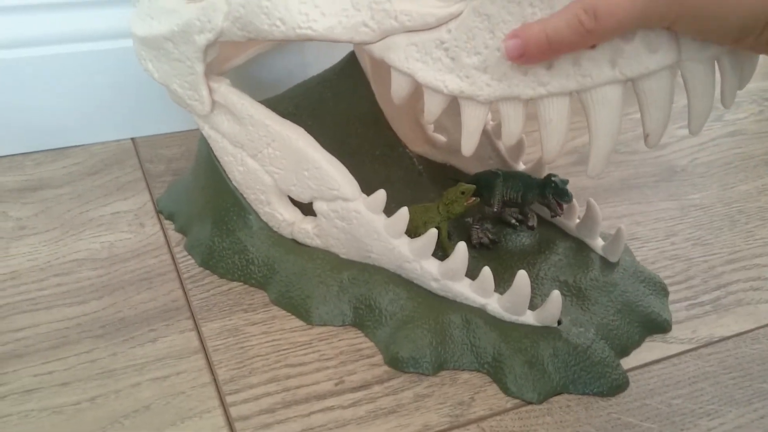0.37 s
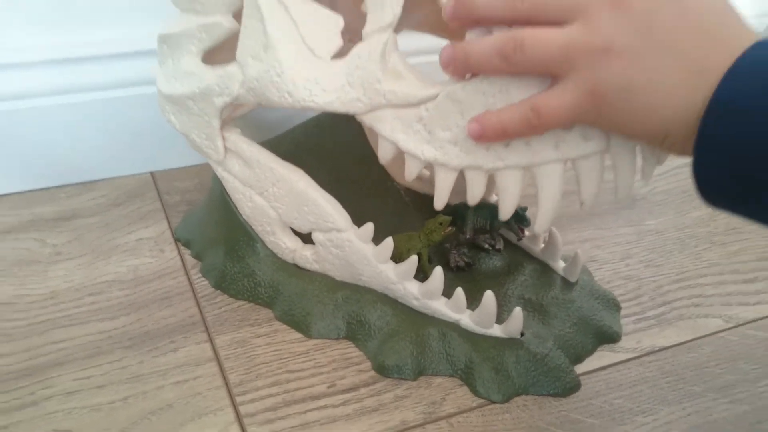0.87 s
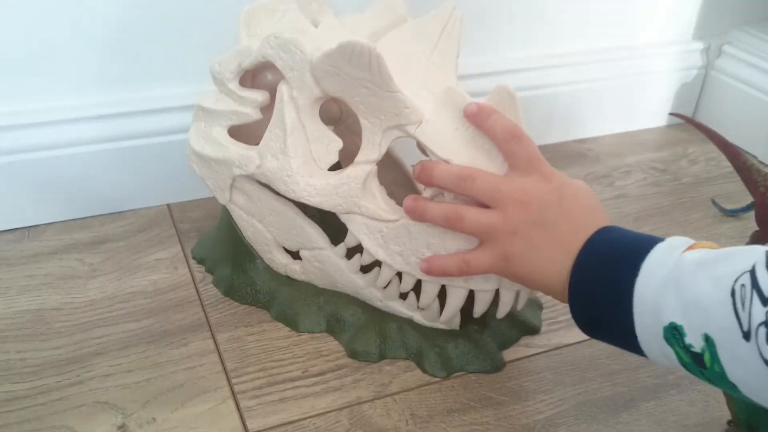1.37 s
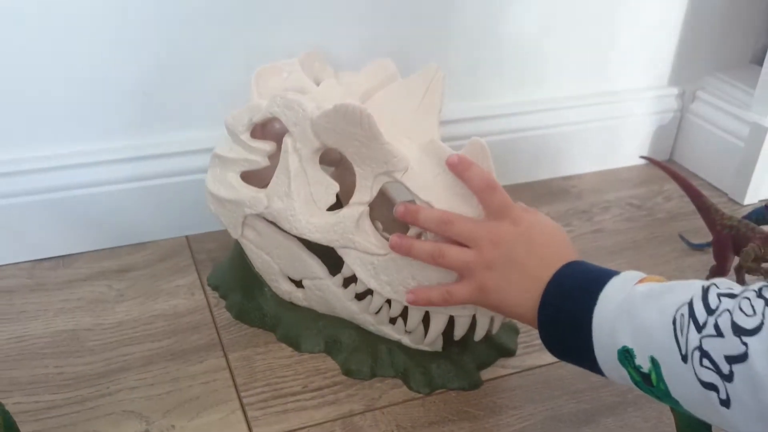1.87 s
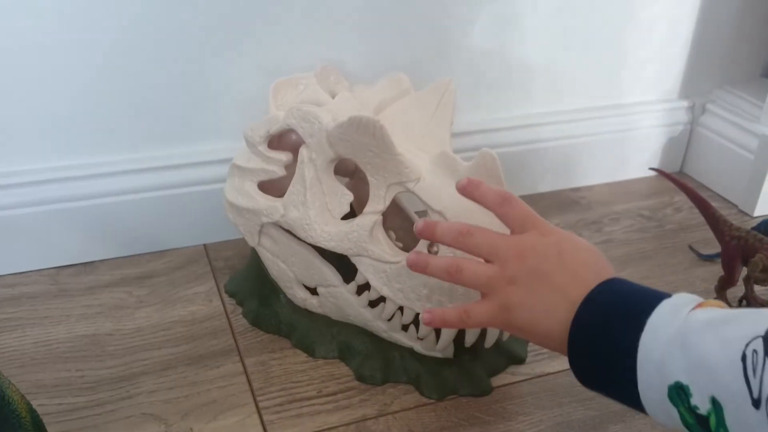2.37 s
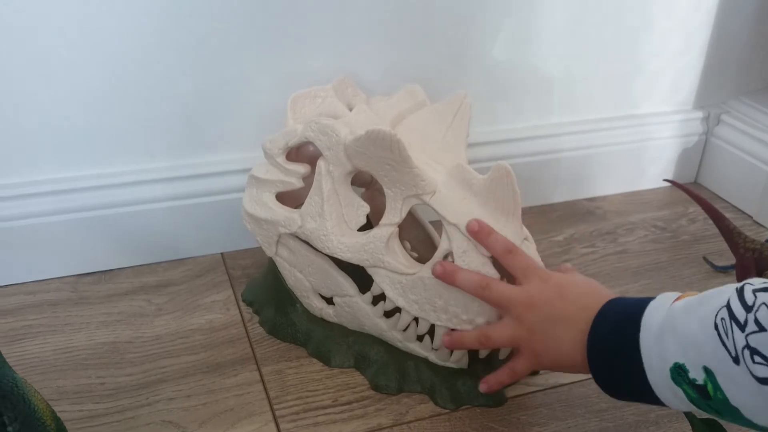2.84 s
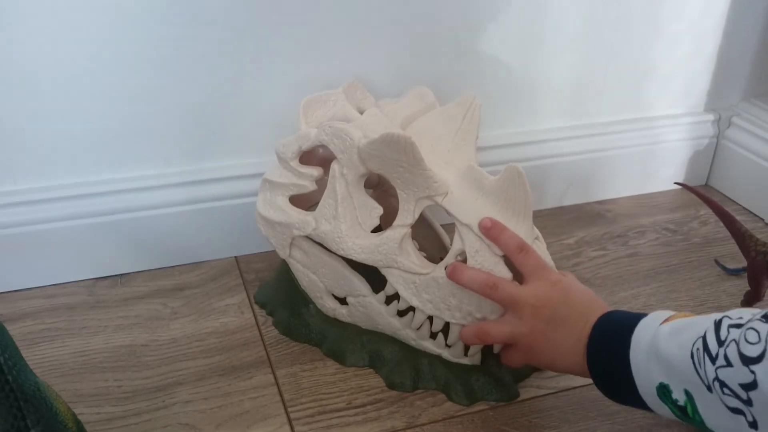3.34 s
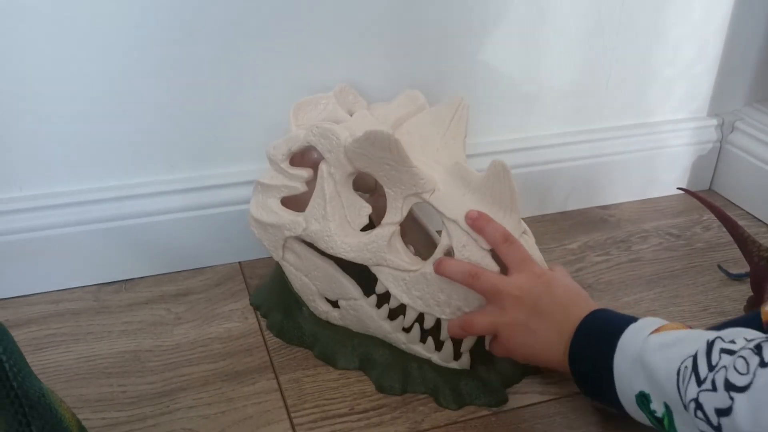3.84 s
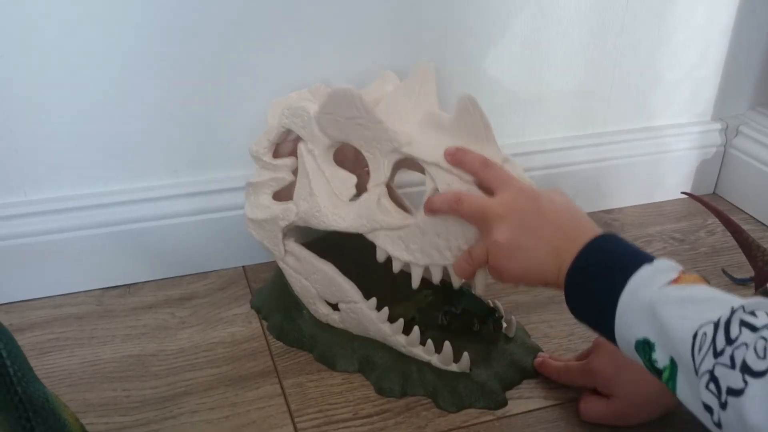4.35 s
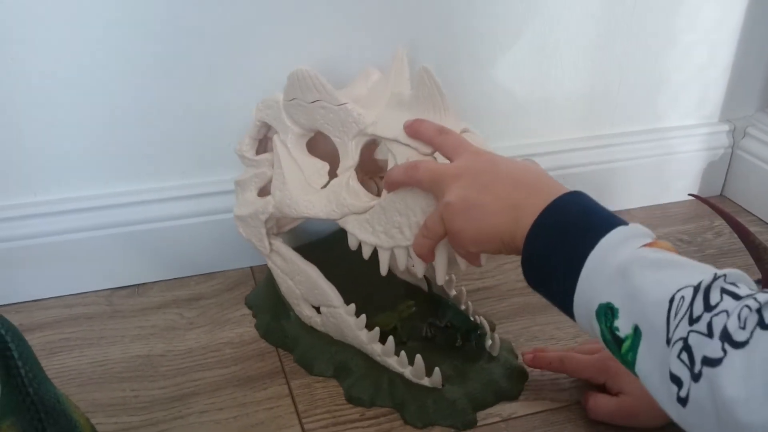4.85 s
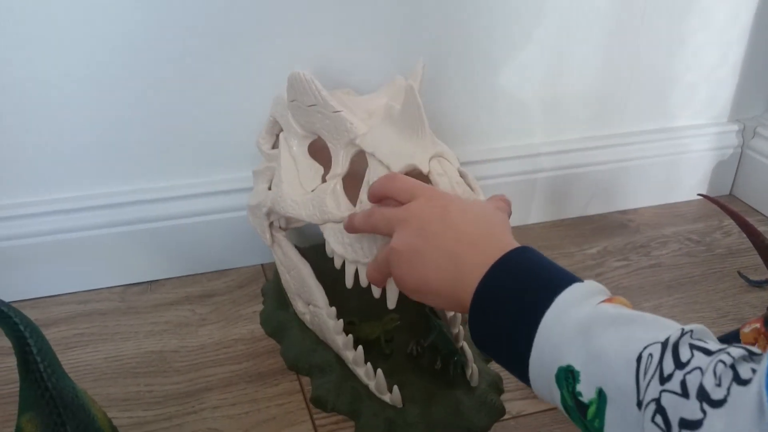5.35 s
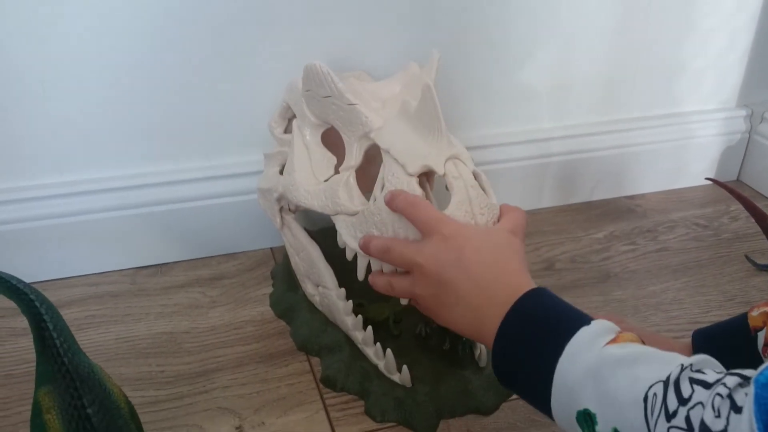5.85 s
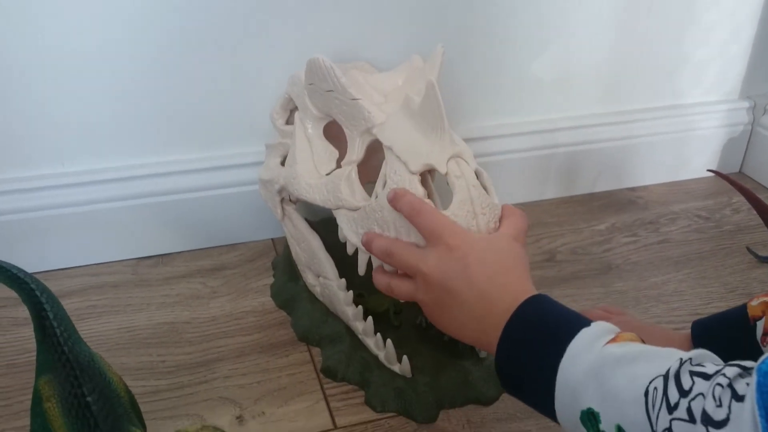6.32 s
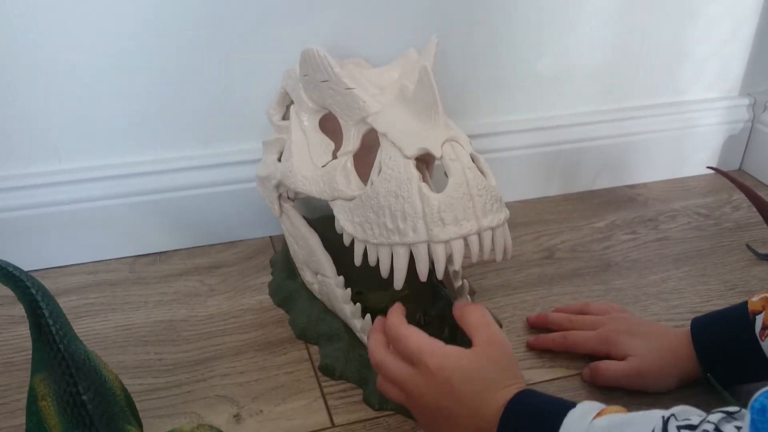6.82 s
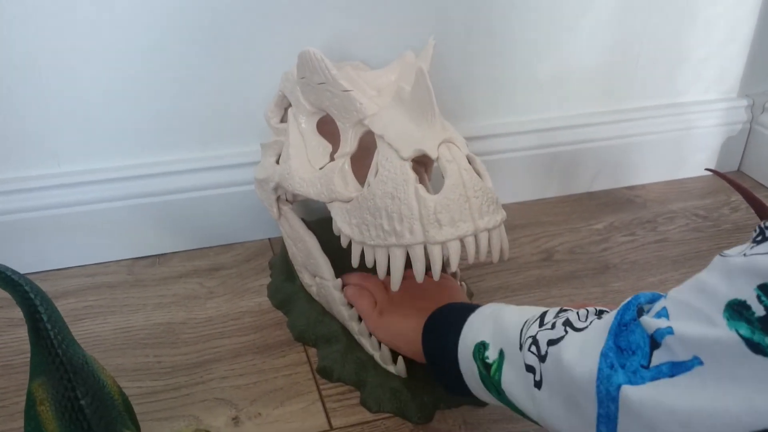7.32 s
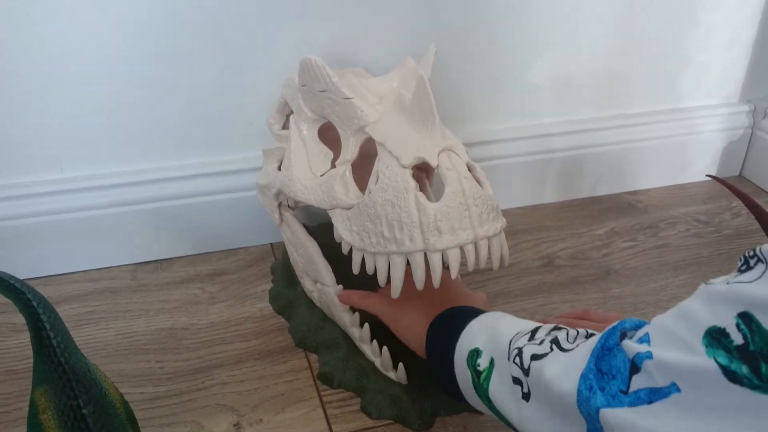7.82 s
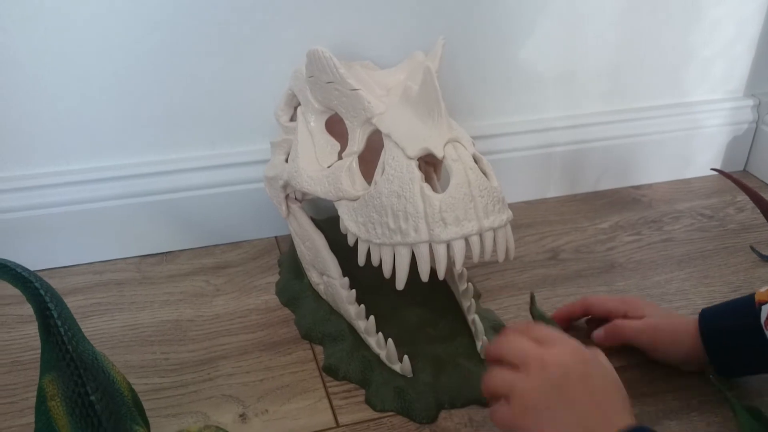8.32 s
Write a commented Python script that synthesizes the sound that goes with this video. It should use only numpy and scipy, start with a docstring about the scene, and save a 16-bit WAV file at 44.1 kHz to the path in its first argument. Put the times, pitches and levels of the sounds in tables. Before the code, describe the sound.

One sharp plastic clack rings briefly off bare walls, followed by tiny sleeve crackles, lighter knocks, dragging plastic and small rattles over quiet room hush.

```python
"""A bare room with a laminate floor: a hollow hard-plastic toy jaw snaps shut, is dragged and knocked by small hands.
Impacts and friction are bursts and streams of random micro-contacts exciting the modes of the shell.
A sleeve crackles as bright filtered bursts over a thin rustle; the floor thumps as decaying low sinusoids.
Two hand-held microphone ports weight and delay the near field; decaying noise gives the room's reverberation,
and diffuse noise its hush and rumble."""
import sys
import numpy as np
from scipy import signal
from scipy.fft import rfft, irfft, next_fast_len
from scipy.io import wavfile
from scipy.ndimage import uniform_filter1d, map_coordinates

SR = 44100
rng = np.random.default_rng(int(sys.argv[2]) if len(sys.argv) > 2 else 0)


def ratio_of_db(decibels):
    """Turn decibels (scalar or array-like) into linear amplitude factors; 0 dB maps to 1."""
    return 10 ** (np.asarray(decibels, float) / 20)


def log_audio(samples):
    """Write samples as a 16-bit WAV file to the path given in sys.argv[1]."""
    # one column per channel
    frames = np.atleast_2d(samples).T
    # limit to full scale, then quantise
    limited = np.clip(frames, -1, 1)
    pcm = np.round(limited * 32767).astype(np.int16)
    wavfile.write(sys.argv[1], SR, pcm)


N = 372204  # length in samples

# Resonances of the hollow shell: [f/Hz, bandwidth/Hz, relative level/dB]
SHELL_MODES = [(452, 86, -3), (690, 330, -7), (822.4, 79, 3), (910, 130, -2.5), (1165, 240, 0),
               (1515, 183, -2.5), (1592, 94, 2), (1815, 57, 2.5), (1933, 75, -0.5), (2100, 94, 0.5),
               (2390, 81, -3.5), (2582, 81, -4.5), (2550, 250, 0.5), (3158, 280, 3), (3192, 64, 7),
               (3490, 124, 2.5), (3833, 810, -3.5), (4200, 84, 3), (4470, 200, -4.5)]


def knocks():
    """Modal excitation: the point of impact favours modes near one pitch; hard blows wake the upper modes."""
    # Knocks, each a flurry of tiny contacts: [t/s, peak level of the whole blow (body plus upper rings) at the
    # source/dB, favoured f/Hz, upper rings re body (hardness)/dB, flurry length/s]
    blows = [(1.1169, -24.5, 1600, -34, .0025), (1.127, -21.5, 2640, -36, .0037),
             (1.133, -20, 2280, -25, 0.0054), (1.1404, -4.5, 1807, -1.5, .003),
             (1.148, -18, 1770, -8, .005), (1.175, -40, 1800, -8, 0.0046), (1.315, -37.5, 3480, -8, 0.0024),
             (1.53, -49.5, 740, -9, 0.0061), (2.842, -52.5, 2900, -32, .004), (2.872, -55, 1700, -25, .004),
             (3.68, -53, 2830, -13, 0.0054), (3.877, -33.5, 1500, -6, .0017),
             (3.8806, -18, 2320, -1, 0.0026), (3.9657, -27.5, 1360, -22, 0.00071),
             (3.982, -37, 3300, -9, .004), (4.451, -41.5, 1600, -33, 0.0029), (5.195, -43, 4500, 5, .005),
             (7.323, -51, 1500, -20.5, .005), (7.393, -45.5, 2570, -24, 0.0048),
             (7.438, -42.5, 1880, -41, 0.0035), (7.529, -48, 2100, -30, 0.0047),
             (7.536, -33, 1920, -17, 0.0105), (7.547, -32.5, 1130, -19, .006),
             (7.623, -51, 900, -24, 0.0052), (7.642, -52, 2970, -18, .004), (7.668, -47, 2670, -14, .004),
             (7.683, -54, 2600, -17, 0.0046), (7.874, -47, 2500, -31, 0.0078),
             (7.882, -40.5, 2500, -28, .006), (7.8907, -31, 2500, -38, 0.00424),
             (7.8946, -36, 2620, -4, 0.0068), (7.904, -27, 2560, -25, 0.0068),
             (7.911, -27.5, 2550, -10, .005), (7.92, -30, 2400, -2.5, .005),
             (8.125, -51.5, 2400, -17, 0.0069), (8.18, -42.5, 4400, 5, .004), (8.245, -41, 900, -2, 0.0056),
             (8.294, -44.5, 1330, -29, 0.0036)]
    # Rings of the small figures and the tray inside the mouth: [f/Hz, bandwidth/Hz, relative level/dB]
    tray_modes = [(800, 68, -4), (911, 55, -0.5), (1562, 61, -2.5), (2074, 71, -4), (2500, 130, -1.5),
                  (2770, 54, 0), (3130, 45, 0), (3790, 170, -9), (4540, 160, -3.5)]
    reach_s = 7.2  # after this the hand is inside the mouth
    focus_db, soft_focus = 2, 0.16  # loss/dB per octave off the favoured pitch; more per dB of softness
    near, around = np.zeros((2, N)), np.zeros(N)
    t = np.arange(4096) / SR
    for s, db, centre_hz, hard_db, length in blows:
        shape = (1 - np.exp(-t / 0.0012)) * np.exp(-(t / length) ** 1.73)
        flurry = evened(grit((2, len(t)), spiky=0.62) * shape) * (shape > 0.01)

        def soft(hz):
            """A broad contact passes little treble, a small shell radiates little bass."""
            contact = 1 / (1 + 1j * hz / (2.6 * centre_hz)) ** 2
            return contact * above(hz, edge_hz=270)

        struck = tray_modes if s > reach_s else SHELL_MODES
        modes = favoured(struck, centre_hz, focus_db - soft_focus * hard_db)
        body = filtered(flurry[0], lambda hz: soft(hz) * rings(modes, hz, scatter_db=1.0))
        # fine contacts reach each port apart
        edge = filtered(flurry, lambda hz: upper(hz, scatter_db=2.0))
        blow = body / np.abs(body).max() + ratio_of_db(hard_db) * edge / np.abs(edge).max()
        add(near, s, blow, db)
        # the walls hear the shell from every side, so its single rings blur into one broad colour
        spectrum = np.abs(rfft(blow[0] / np.abs(blow).max()))
        power = uniform_filter1d(spectrum ** 2, size=110)
        blur = np.roll(irfft(np.sqrt(np.abs(power))), 128)[:256] * np.hanning(256)
        around[round(s * SR):][:256] += ratio_of_db(db) * blur
    return near, around


def rubs():
    """Friction excitation: dense grit drives the shell modes, stuttering as surfaces catch; weight adds low drag."""
    # Strokes of the base and teeth rubbing:
    # [t of full pressure/s, hold/s, body level at the source/dB, low drag re body (weight)/dB]
    strokes = [(.1, 0.012, -64, 2.5), (1.121, .005, -60.5, -5), (2.968, 0.078, -58.5, -9),
               (3.107, 0.039, -56.5, -29), (3.321, 0.076, -56, -9), (3.859, 0.041, -55, -15),
               (4.784, .02, -59, -5), (4.819, 0.043, -54, -13), (4.9, 0.071, -61, -9),
               (5.018, 0.026, -55, -12), (5.085, 0.028, -52.5, -9.5), (5.151, 0.065, -55, -6),
               (7.603, 0.033, -72, -12), (8.299, 0.09, -65.5, 2.5)]
    press_db_per_s, sag_db_per_s, lift_db_per_s = 449, 31.5, 402.5
    t = np.arange(N) / SR
    pressure, weight = np.zeros((2, N))
    for s, hold, db, weight_db in strokes:
        pressing = press_db_per_s * np.maximum(s - t, 0)
        sagging = sag_db_per_s * np.maximum(t - s, 0)
        lifting = lift_db_per_s * np.maximum(t - s - hold, 0)  # adds to the sag after the hold
        stroke = ratio_of_db(db - (pressing + sagging + lifting))
        pressure += stroke
        weight += ratio_of_db(weight_db) * stroke
    stutter = map_coordinates(rng.standard_normal(1000), [t * 90])  # 90 random points a second
    grains = grit((3, N), spiky=0.68)
    shared = grains[0] + 0.53 * grains[1:]  # partly alike at the two ports
    body_modes = favoured(SHELL_MODES, 1950, focus_db=6.5)
    low_modes = favoured(SHELL_MODES, 800, focus_db=7.0)
    body = unit(filtered(shared, lambda hz: rings(body_modes, hz)))
    low = unit(filtered(grains[0], lambda hz: rings(low_modes, hz)))
    edge = unit(filtered(grains[1:], lambda hz: upper(hz)))
    drag = ratio_of_db(1.9 * stutter) * (pressure * body + weight * low)
    treble = ratio_of_db(-5 + 0.9 * stutter) * pressure * edge
    return drag + treble


def sleeve():
    """Impulsive noise: short bright bursts of grit around one broad resonance, over a thin rustle."""
    # Dry crackles of the sleeve: [t/s, peak level at the source/dB, centre f/Hz]
    crackles = [(1.4979, -43, 8510), (1.5986, -45, 4800), (1.697, -41.5, 4310), (1.7674, -41.5, 9100),
                (1.8008, -42.5, 7570), (1.8294, -48, 6680), (1.921, -44.5, 8800), (2.0246, -46, 6240),
                (2.1849, -48.5, 6360)]
    crackle_s = 0.01
    rustle_s, rustle_wide_s, rustle_db = 1.95, 0.302, -71.5  # the sleeve slides: middle, half length, level
    out, t = np.zeros((2, N)), np.arange(2048) / SR
    shape = (1 - np.exp(-t / 0.002)) * np.exp(-(t / crackle_s) ** 2)
    for s, db, centre_hz in crackles:
        burst = grit((2, len(t)), spiky=0.72) * shape
        modes = [(centre_hz, 4000, 0), (3700, 900, -3)]
        crackle = filtered(burst, lambda hz: rings(modes, hz) / (1 + (hz / 11000) ** 4))
        add(out, s, crackle, db)
    slide = filtered(grit((2, N), spiky=0.6),
                     lambda hz: rings([(7900, 1900, 0)], hz) * above(hz, edge_hz=2700))
    swell = np.exp(-((np.arange(N) / SR - rustle_s) / rustle_wide_s) ** 2)
    return out + ratio_of_db(rustle_db) * swell * unit(slide)


def thumps():
    """Modal superposition: the boards swing a few low cycles, most near the pitch that the spot favours."""
    # Soft thumps: [t/s, peak level before the high-pass and port gains/dB, favoured f/Hz, focus/(dB per octave)]
    soft_blows = [(0.688, -53, 329, 16), (0.707, -61.5, 100, 12), (1.141, -26, 450, 6),
                  (1.313, -54, 290, 20), (3.806, -56, 80, 28), (3.882, -42.5, 600, 13),
                  (6.39, -59.5, 75, 25)]
    # Low rings of the base and the floorboards: [f/Hz, t60/s, relative level/dB]
    boards = [(80, .1, -7.5), (116.3, .45, -8.5), (178, 0.039, 0), (271.6, 0.029, -6.5),
              (349.5, 0.068, -2.5), (458.4, .05, 4.5), (617, 0.054, -5.5)]
    out, t = np.zeros(N), np.arange(SR // 2) / SR
    for s, db, centre_hz, focus_db in soft_blows:
        swing = np.zeros(len(t))
        for k, (hz, t60, level_db) in enumerate(favoured(boards, centre_hz, focus_db)):
            decay = ratio_of_db(level_db - 60 * t / t60)
            swing += (-1) ** k * decay * np.sin(2 * np.pi * hz * t)
        add(out, s, swing * (1 - np.exp(-t / 0.00081)), db)
    return filtered(out, lambda hz: above(hz, edge_hz=67))


def ports(x):
    """Interaural-like cues: level and phase differences by frequency place a near sound at the two ports."""
    # How the ports favour a near sound: [f/Hz, left minus right level/dB]
    near_lean = [(150, 3.5), (400, -7), (800, -9), (1300, -12), (2100, -19.5), (3300, -13.5), (4600, -4),
                 (6000, 8.5), (8500, 7), (11000, 0), (14000, -10.5)]
    # Phase lag of the left port behind the right: [f/Hz, lag/rad]
    near_turn = [(0, 8), (700, 1.5), (1150, 2.5), (1800, 0), (2750, -11), (3950, -7), (5500, -14.5),
                 (16000, -44.5)]

    def pair(hz):
        angle = np.arctan(ratio_of_db(-along(near_lean, hz)))  # constant total power
        turn = np.interp(hz, *np.transpose(near_turn))
        return np.sqrt(2) * np.array([np.cos(angle) * np.exp(-1j * turn), np.sin(angle) + 0j])
    return filtered(x, pair)


def room(x):
    """Reverberation as convolution with noise decaying by frequency, new every quarter second and in each port."""
    # Reverberation time: [f/Hz, t60/s]
    decay_times = [(120, 0.591), (500, 0.61), (1500, 0.59), (5000, 0.53), (12000, 0.47)]
    out, step = np.zeros((2, N + SR)), SR // 4
    delay = 100  # samples before the first reflection
    for i in range(0, N, step):
        hz, t, z = signal.stft(rng.standard_normal((2, SR * 3 // 5)), SR, nperseg=256)
        early = 1 + 2.2 * np.exp(-t / 0.013)  # the near wall and floor come first and strongest
        decay = ratio_of_db(-60 * t / along(decay_times, hz)[:, None])
        tail = signal.istft(z * early * decay, SR, nperseg=256)[1]
        wet = signal.fftconvolve(x[:, i:i + step], tail / np.linalg.norm(tail[0]), axes=1)
        out[:, i + delay:][:, :wet.shape[1]] += wet[:, :N + SR - i - delay]
    return out[:, :N]


def air():
    """Stationary diffuse noise with slow level changes: the room's hush over a faint rumble of the house."""
    # Spectral shape of the hush: [f/Hz, relative density/(dB per Hz)]
    hush_shape = [(76, -46), (130, -7.5), (169, -2.5), (194, -8.5), (284, -6.5), (477, -7.5), (644, -4),
                  (887, -5), (1130, -6), (1750, -9), (6690, -13.5), (15500, -36)]
    # Spectral shape of the rumble: [f/Hz, relative density/(dB per Hz)]
    rumble_shape = [(18, -69.5), (30, -23), (65, 2.5), (118, -3), (140, -28.5), (170, -12), (220, -21.5),
                    (370, -120)]
    # Levels over time: [t/s, hush rms level/dB, rumble rms level/dB]
    air_levels = [(0, -65.5, -70), (1, -64.5, -71.5), (3.6, -62, -72.5), (5.4, -63, -71), (6, -64.5, -73.5),
                  (8.44, -61, -75)]
    s, hush_db, rumble_db = np.transpose(air_levels)
    t = np.arange(N) / SR
    hush = ratio_of_db(np.interp(t, s, hush_db)) * diffuse(hush_shape, patchy_db=0.03)
    rumble = ratio_of_db(np.interp(t, s, rumble_db)) * diffuse(rumble_shape, patchy_db=0.0)
    return hush + rumble


def diffuse(spectrum, patchy_db):
    """Diffuse-field coherence: noise from all sides, correlated by frequency, opposed between ports in the bass."""
    # Correlation of the ports: [f/Hz, left-right likeness/1]
    alike = [(60, -0.64), (150, -0.62), (380, -0.39), (950, 0.037), (2380, -0.01), (5980, 0.089),
             (15000, 0.05)]
    # Balance of the ports: [f/Hz, left minus right level/dB]
    air_lean = [(60, -3.5), (150, -2), (380, -2), (950, -2.5), (2380, -3.5), (5980, 0.5), (15000, 1)]
    z = signal.stft(rng.standard_normal((2, N + 512)), nperseg=512)[2]
    field = uniform_filter1d(rng.standard_normal(z.shape[1:]), 8, 0)
    field = uniform_filter1d(field, 30, 1)
    pair = signal.istft(z * ratio_of_db(patchy_db * unit(field)), nperseg=512)[1][:, :N]

    def mid_side(hz):
        angle = np.arccos(np.clip(along(alike, hz), -1, 1)) / 2
        return ratio_of_db(along(spectrum, hz)) * np.array([np.cos(angle), np.sin(angle)])

    mid, side = filtered(pair, mid_side)
    left_right = np.array([mid + side, mid - side])
    return unit(filtered(left_right, lambda hz: ratio_of_db(np.outer([0.5, -0.5], along(air_lean, hz)))))


def rings(modes, hz, scatter_db=0):
    """Modal sum: causal second-order resonances of alternating sign, each scattered in strength."""
    luck = scatter_db * rng.standard_normal(len(modes))
    return sum((-1) ** k * ratio_of_db(db + luck[k]) * 1j * hz * w / (c * c - hz * hz + 1j * hz * w)
               for k, (c, w, db) in enumerate(modes))


def upper(hz, scatter_db=0):
    """Power addition: the plain crack of the surfaces fills in between the upper modes."""
    # Thin, quickly damped upper rings of the shell: [f/Hz, bandwidth/Hz, relative level/dB]
    upper_modes = [(4800, 120, -8), (5440, 340, -1), (5880, 610, -2), (6410, 600, 0), (7030, 460, -2.5),
                   (8170, 1200, -6), (9340, 1000, -6.5), (12600, 1100, -15)]
    tuned = rings(upper_modes, hz, scatter_db)
    crack = ratio_of_db(-8.5) * above(hz, edge_hz=3000) / (1 + (hz / 11500) ** 6)
    return np.hypot(np.abs(tuned), np.abs(crack)) * np.exp(1j * np.angle(tuned))


def favoured(modes, centre_hz, focus_db):
    """Selective excitation: modes weaken with each octave away from one pitch."""
    return [(c, w, db - abs(focus_db * np.log2(c / centre_hz))) for c, w, db in modes]


def grit(size, spiky):
    """Log-normally modulated noise: tiny contacts of very uneven strength."""
    return rng.standard_normal(size) * np.exp(spiky * rng.standard_normal(size))


def evened(x):
    """Spectral whitening: very short contacts push every pitch about equally."""
    z = rfft(x)
    power = uniform_filter1d(np.abs(z) ** 2, size=24)
    return irfft(z / np.sqrt(np.abs(power) + 1e-12))


def above(hz, edge_hz):
    """A causal second-order high-pass response."""
    return (1j * hz / edge_hz / (1 + 1j * hz / edge_hz)) ** 2


def filtered(x, response):
    """Linear filtering: the spectrum times a complex response of frequency."""
    n = x.shape[-1]
    m = next_fast_len(n + 4096)
    return irfft(rfft(x, m) * response(np.fft.rfftfreq(m, 1 / SR)), m)[..., :n]


def along(points, hz):
    """Interpolation of [f/Hz, value] points on a logarithmic frequency axis."""
    f, v = np.transpose(points)
    return np.interp(np.log(hz + 1), np.log(f + 1), v)


def unit(x):
    """Normalisation to rms 1."""
    return x / np.sqrt(np.mean(x ** 2) + 1e-20)


def add(track, s, sound, db):
    """Superposition: lays a sound on a track from time s with its peak at db."""
    spot = track[..., round(s * SR):][..., :sound.shape[-1]]
    spot += (ratio_of_db(db) * sound / np.abs(sound).max())[..., :spot.shape[-1]]


def scene():
    """Direct plus reverberant field: toy and sleeve close by, the room behind them."""
    blows, around = knocks()
    handling = rubs() + sleeve()
    low = thumps() * [[-1.2], [2.8]]  # opposed between the ports, like all bass
    # the walls return less above 9 kHz
    dulled = filtered(ports(around + handling), lambda hz: 1 / (1 + 1j * hz / 9000))
    reverberant = ratio_of_db(-7.5) * room(dulled + 0.71 * low)
    return ports(blows + handling) + low + reverberant + air()


def top_cut(x):
    """Nothing passes above the cut-off."""
    return signal.sosfilt(signal.butter(12, 16500, fs=SR, output="sos"), x)


def record(dry):
    """The two port signals are taken as the finished mix, with no further gain."""
    return top_cut(dry)


dry = scene()
out = record(dry)
log_audio(out)
```